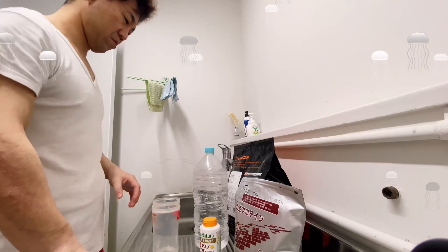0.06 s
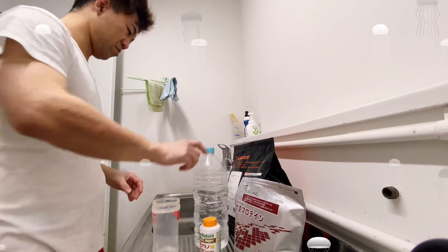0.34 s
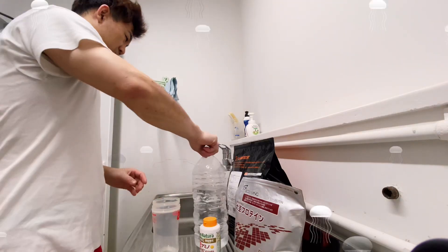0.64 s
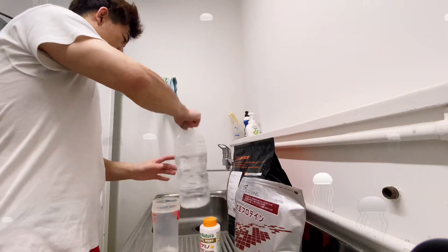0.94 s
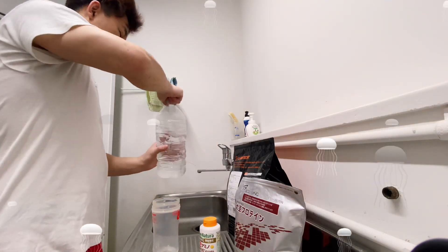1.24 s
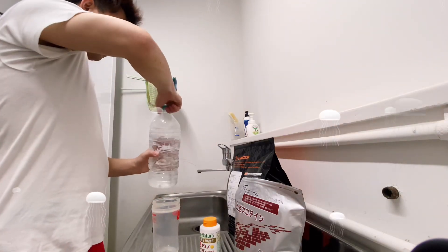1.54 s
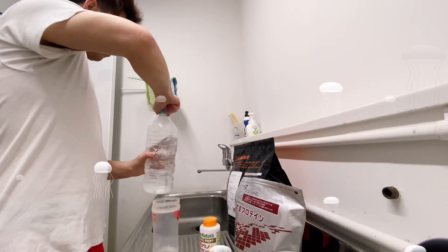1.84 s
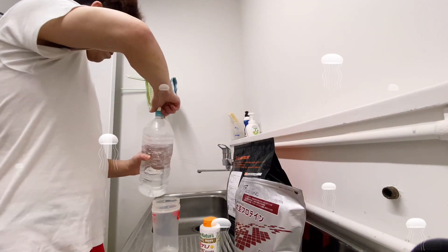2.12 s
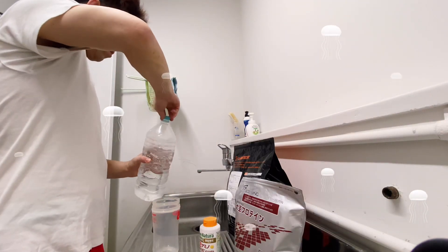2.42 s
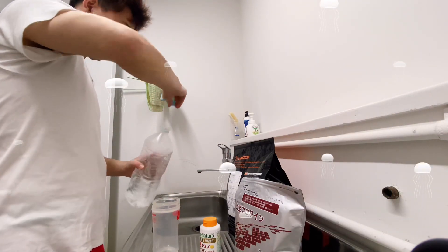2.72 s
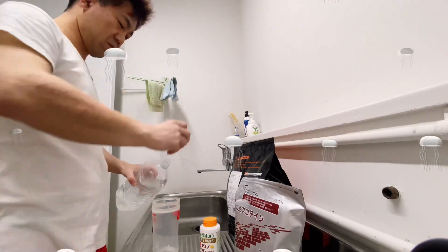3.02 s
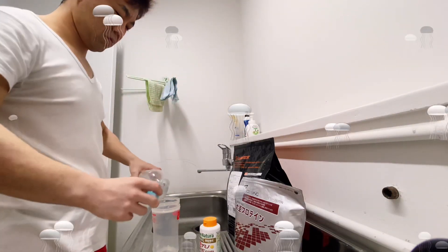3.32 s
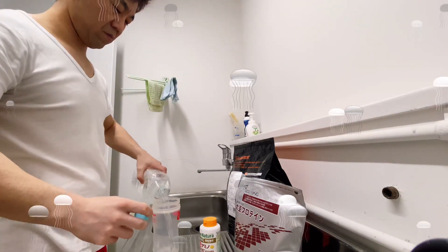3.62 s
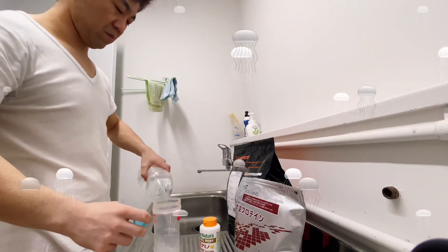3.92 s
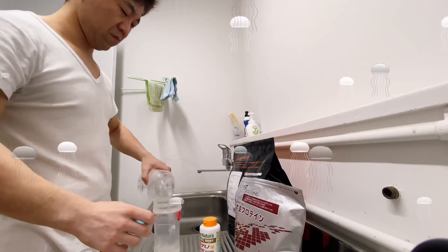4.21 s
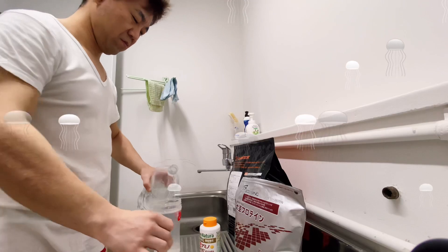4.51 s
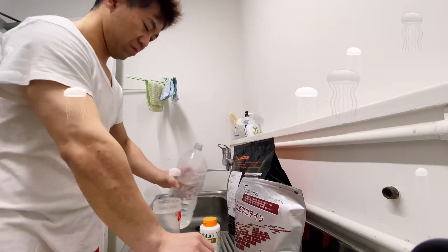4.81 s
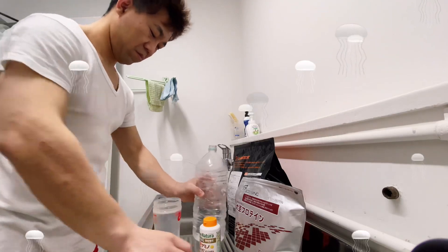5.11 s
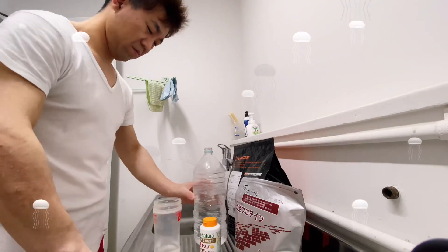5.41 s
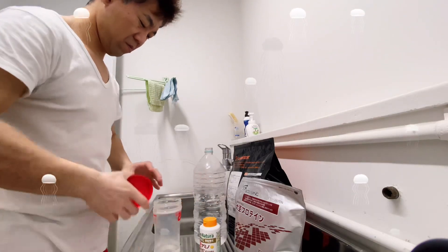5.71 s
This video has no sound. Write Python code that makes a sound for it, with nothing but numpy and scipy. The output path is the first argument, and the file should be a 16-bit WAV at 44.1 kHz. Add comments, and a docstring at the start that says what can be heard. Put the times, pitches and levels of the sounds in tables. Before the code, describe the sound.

Over a faint, low rush of ventilation, a loud plastic knock at a steel sink is followed by quiet cap twisting and hollow pops from a thin water bottle, one much louder than the rest. Water gushes and bubbles into a plastic cup for just over a second. Sharp clacks follow, then the bottle judders across the drainboard and thuds down. Everything is heard from nearby in a small, echoing room.

```python
"""A small, hard-walled washroom, where a big, thin plastic water bottle is handled at a steel sink.
Plastic clacks on the drainboard. The bottle's wall buckles with hollow pops and crackles as the cap is
twisted off. Water pours into a shaker cup: it drums on the bottom, splashes, and traps air that rings
as bubbles. The bottle is then knocked, slid and set down with a thud. Ventilation rushes underneath."""
import sys
import numpy as np
from scipy import signal
from scipy.fft import rfft, irfft, next_fast_len
from scipy.io import wavfile
from scipy.ndimage import map_coordinates

SR = 44100
rng = np.random.default_rng(int(sys.argv[2]) if len(sys.argv) > 2 else 0)


def digitize_waveform(pressure):
    """Quantize a signal to 16-bit integers and store it at the path in sys.argv[1].

    Rows of a 2-D input are taken as channels; values are limited to [-1, 1].
    """
    field = np.atleast_2d(pressure).T
    bounded = np.clip(field, -1, 1)
    quanta = np.round(bounded * 32767).astype(np.int16)
    wavfile.write(sys.argv[1], SR, quanta)


N = 253575
TIME = np.arange(N) / SR
RING_SAMPLES = SR // 2

# plastic hits the sink: t/s, clatter length/s, level/dB, hardness/0-1
KNOCKS = [(-.1, 0.08, -23, 0.63), (0.125, 0.039, -16, 0.55), (0.153, 0.14, -19.5, 0.45),
          (0.51, 0.02, -49.5, 0.78), (0.651, 0.011, -50, 0.56), (4.955, 0.014, -37.5, 0.9),
          (4.9789, 0.01, -25.5, 0.74), (5.002, 0.079, -27.5, 0.68), (5.155, 0.024, -35, 0.07),
          (5.335, 0.023, -30, 0), (5.365, 0.0071, -44.5, 0.76), (5.405, 0.019, -45.5, 0.81)]
# how a knock drives boom, clack and click, a row each: soft/dB, hard/dB
KNOCK_DRIVE = [(-9.5, -23.5), (-1, 0), (-35.5, 12.5)]
# the stream from the tilted bottle: t/s, level/dB
FLOW = [(3.52, -74), (3.63, -42.5), (3.73, -52.5), (3.89, -49.5), (4.05, -39.5), (4.188, -61), (4.28, -39),
        (4.45, -51.5), (4.75, -53), (4.919, -63)]
# the colour of fine spray: f/Hz, level/dB
SPRAY = [(800, -24), (2000, 4), (3200, 6), (5500, 3.5), (8000, 0.5), (10000, -9), (12000, -3),
         (16000, -16.5)]


def bottle_pops():
    """The thin wall snaps in under the grip, rings the air and water inside, and springs back softly."""
    # the wall buckles: t/s, length/s, level/dB, hardness/0-1, dent depth/dB, hollow ring/dB
    pops = [(1.093, 0.0075, -52.5, 0.59, 0, -63), (1.282, 0.0074, -46.5, 0.85, 1, -62),
            (1.292, 0.0094, -37.5, 0.57, 10.5, -31), (1.562, 0.0069, -46, 0.8, 7, -51),
            (1.761, 0.011, -51.5, 0.7, -1, -65), (1.798, 0.027, -48, 0.1, 7, -31.5),
            (1.874, 0.022, -33, 0.43, -6, -31), (1.9884, 0.008, -16.5, 0.59, -7.5, -17.5),
            (2.379, 0.011, -28, 0.05, -31, -33.5), (2.553, 0.019, -42, 0.79, 4, -40.5),
            (2.765, 0.019, -54.5, 0.02, -20.5, -58.5), (3.141, 0.027, -46.5, 0.22, 4, -49.5)]
    # how a pop drives thump, wall, slap and crackle, a row each: soft/dB, hard/dB
    pop_drive = [(3, -5.5), (0, -3), (-0.5, -2.5), (-29.5, 5.5)]
    # the four colours of a pop, low to high: f/Hz, level/dB
    thump = [(50, -43), (110, -8.5), (170, -5), (230, 2), (350, 1), (600, -9), (900, -15), (1500, -39),
             (5000, -61)]
    wall = [(100, -25), (220, -18), (310, -9.5), (400, 0), (470, 5), (540, -4), (620, 0.5), (740, -6.5),
            (900, -5.5), (1100, -12), (2300, -29), (6000, -84), (16000, -96)]
    slap = [(300, -50), (700, 6.5), (850, 2.5), (1000, -0.5), (1100, 2.5), (1260, 1), (1700, -10.5),
            (2300, -15), (2900, -25.5), (3600, -33), (6000, -52), (16000, -69)]
    crackle = [(300, -12), (1200, 17), (2200, 17.5), (3600, 8), (4500, 1.5), (7000, -9), (9500, -23),
               (11500, -38.5), (16000, -64)]
    # the hollow inside: pitch ratio, level/dB
    hollow_modes = [(.53, -12.5), (.72, -4), (.87, -2.5), (1, 4.5), (1.37, -1.5)]
    snaps, hollow = [], np.zeros((2, N))
    for t, length, db, hardness, dent_db, ring_db in pops:
        rebound = (t + 0.014, length * 1.66, db - 3)
        for at, span, level in ((t, length, db), rebound):
            thump_db, *shell_dbs = drive(pop_drive, level, hardness)
            snaps.append((at, span, thump_db + dent_db, *shell_dbs))
        hz = 415.4 + 3 * (ring_db + 30)  # a louder hollow ring sounds a little higher
        cavity = sum(amp(level) * ring(ratio * hz, t60=0.061, attack=0.012)
                     for ratio, level in hollow_modes)
        add(hollow, t, amp(ring_db) * dose(room(cavity, near_db=14.5, early_db=18.5)))
    return hollow + blows(snaps, (thump, wall, slap, crackle),
                          near_db=-2, early_db=2.5, rough=0.7, rise=0.15, trim_db=1.5)


def sink_knocks():
    """Plastic clatters on the steel drainboard, and the bottle's heavy base thuds."""
    # the three colours of a knock, low to high: f/Hz, level/dB
    boom = [(25, -32), (45, -21), (75, -13), (92, -21.5), (120, 8.5), (200, -8), (330, -8), (600, -9),
            (1500, -53.5), (5000, -75.5)]
    clack = [(80, -46.5), (250, -0.5), (450, -0.5), (850, 2), (1450, -1), (2500, -5.5), (4000, -16),
             (7000, -32), (16000, -51.5)]
    click = [(300, -38.5), (1500, 9.5), (2400, 10), (3300, 3), (4700, 0.5), (6200, -4.5), (8000, -7.5),
             (9800, -16.5), (11500, -15.5), (16000, -27)]
    # the base lands or bumps over a rib: t/s, level/dB, brightness/dB per octave
    thuds = [(.127, -30, -6.5), (.152, -31.5, -12.5), (.49, -36, 0), (0.586, -43.5, -16), (0.662, -47, -11),
             (.738, -44, -13), (5.179, -28.5, -5.5), (5.204, -30.5, -3), (5.241, -32, -5),
             (5.266, -34.5, 4.5), (5.3225, -23.5, -0.5), (5.344, -22.5, 5)]
    # the ring of the base: f/Hz, level/dB, t60/s
    base_modes = [(120.3, -9.5, 0.049), (185.5, -0.5, 0.051), (367, 2, 0.031), (484, 1.5, 0.021),
                  (619.4, -6.5, 0.25), (776.6, -5.5, 0.051)]
    hits = [(t, length, *drive(KNOCK_DRIVE, db, hardness)) for t, length, db, hardness in KNOCKS]
    track = blows(hits, (boom, clack, click),
                  near_db=-6.5, early_db=-1.5, rough=0.64, rise=0.06, trim_db=4.5)
    modes = [(np.log2(hz), amp(db) * ring(hz, t60, attack=0.011)) for hz, db, t60 in base_modes]
    for t, db, tilt_db in thuds:
        base = sum(amp(tilt_db * octave) * mode for octave, mode in modes)
        add(track, t, amp(db) * dose(room(base, near_db=2, early_db=-0.5)))
    return track


def water():
    """Gushes and a thin stream drum on the cup's bottom, splash, spray and froth."""
    # gushes land in the cup: t/s, length/s, level/dB, hardness/0-1
    gushes = [(3.526, 0.018, -39.5, 0.18), (3.605, 0.013, -36, 0.1), (3.635, 0.03, -40, 0),
              (3.954, 0.027, -25, 0.79), (3.983, 0.03, -24, 0.3), (4.115, 0.035, -43.5, 0),
              (4.227, 0.028, -33.5, 0.41), (4.313, 0.05, -41, 0.9), (4.418, 0.018, -48.5, 0.99),
              (4.505, 0.026, -44, 0.72), (4.605, 0.03, -42.5, 0.51), (4.723, 0.021, -47, 0.54)]
    # how a gush drives drum, splash and spray, a row each: soft/dB, hard/dB
    gush_drive = [(2.5, -23.5), (-11, -2), (-44, -0.5)]
    # the colours of the drumming bottom and of the splash: f/Hz, level/dB
    drum_colour = [(30, -25), (70, -7.5), (95, -10), (120, 2), (180, -6), (240, -5.5), (320, -5.5),
                   (480, -9), (1000, -19.5), (4000, -74.5)]
    splash_colour = [(120, -24), (300, -0.5), (500, 0), (900, 3), (1500, 0.5), (2400, -4), (4000, -19.5),
                     (8000, -28.5), (16000, -42)]
    hits = [(t, length, *drive(gush_drive, db, hardness)) for t, length, db, hardness in gushes]
    track = blows(hits, (drum_colour, splash_colour, SPRAY),
                  near_db=-7, early_db=-4, rough=1.4, rise=0.057, trim_db=4.5)
    t, flow_db = np.transpose(FLOW)
    drum_db = flow_db + 8 - 6.5 * (t - t[0])  # the bottom drums less as the cup fills
    spurts_per_s, spurt_db = 16, 4  # the stream breaks up, so the spray comes in spurts
    spurt_sizes = rng.standard_normal(int(TIME[-1] * spurts_per_s) + 4)
    spurts = amp(spurt_db * map_coordinates(spurt_sizes, [TIME * spurts_per_s]))
    drum = grains(drum_colour, t, drum_db, rate=310, scatter_db=1.5)
    splash = grains(splash_colour, t, flow_db, rate=220, scatter_db=0.5)
    spray = spurts * grains(SPRAY, t, flow_db - 12, rate=400, scatter_db=5)
    gurgle = froth(count=100, low_hz=333, high_hz=2540, cycles=20, level_db=flow_db - 8, range_db=21)
    fizz = froth(count=120, low_hz=3940, high_hz=12000, cycles=8.7, level_db=flow_db - 10.5, range_db=14)
    stream = drum + splash + spray + gurgle + fizz
    add(track, 0, amp(-9.5) * room(stream, near_db=-10.5, early_db=-4.5))
    return track


def froth(count, low_hz, high_hz, cycles, level_db, range_db):
    """Small bubbles chirp upward all through the pour, following its level."""
    track, t = np.zeros((1, N)), np.transpose(FLOW)[0]
    for when, height, weakness in rng.random((count, 3)):
        at = t[0] + when * (t[-1] - t[0])
        hz = low_hz * (high_hz / low_hz) ** height
        gain = amp(np.interp(at, t, level_db) - range_db * weakness)
        add(track, at, gain * ring(hz, cycles / hz, attack=0.0005, glide=0.35)[None])
    return track[0]


def trapped_air():
    """Pockets of trapped air gurgle and fizz in the cup."""
    # a pocket breaks up: t/s, length/s, f/Hz, level/dB
    pockets = [(3.547, 0.035, 492, -37), (3.607, .05, 453, -38), (3.786, .02, 10600, -56.5),
               (3.8, 0.043, 8900, -51), (4.011, 0.031, 3290, -33), (4.126, 0.027, 11300, -51),
               (4.226, .04, 503, -38), (4.237, .04, 737, -35.5), (4.306, 0.027, 3900, -51),
               (4.319, 0.033, 1480, -38.5), (4.343, 0.028, 1730, -34.5), (4.36, .03, 10900, -56.5),
               (4.409, 0.033, 8300, -49.5), (4.416, 0.018, 3220, -54), (4.445, .03, 7300, -49),
               (4.485, 0.055, 1920, -44.5), (4.632, 0.016, 2370, -46), (4.718, .04, 6100, -59)]
    track = np.zeros((1, N))
    for t, length, hz, db in pockets:
        add(track, t, amp(db - 9.5) * bubble_cluster(hz, length)[None])
    return room(track[0], near_db=2.5, early_db=2)[:, :N]


def bubble_cluster(hz, length, count=11, spread=0.06, climb=0.12, range_db=12):
    """One pocket of air breaks into short-lived bubbles, the later ones smaller and higher."""
    cluster, order = np.zeros((1, N)), np.arange(count) / count
    for when, detune, weakness in zip(order, rng.standard_normal(count), rng.random(count)):
        pitch = hz * np.exp(spread * detune + climb * (when - 0.5))
        t60 = 0.015 * (1000 / pitch) ** 0.5  # smaller bubbles die sooner
        bubble = amp(-range_db * weakness) * ring(pitch, t60, attack=0.0003, glide=0.05)
        add(cluster, (when + rng.random() / count) * length, bubble[None])
    return dose(cluster[0, :RING_SAMPLES])


def dribbles():
    """Until water covers it, the cup's thin bottom rings under each dribble."""
    # the first dribbles: t/s, length/s, level/dB
    hits = [(3.529, 0.027, -56.5), (3.695, 0.012, -34), (3.755, 0.087, -43), (3.825, 0.03, -41.5),
            (3.9, 0.085, -43)]
    # the colour of the bare bottom: f/Hz, level/dB
    cup = [(1000, -29), (1250, -10), (1430, 4), (1600, -19), (2350, -8), (2680, 5.5), (2880, -2), (3050, 7),
           (3250, -13), (4300, -12), (4700, -6), (5400, -13), (7000, -16), (9000, -31)]
    return blows(hits, (cup,), near_db=-12, early_db=20, rough=1.7, rise=0.034, trim_db=1.5)


def spatters():
    """Drops fly off the stream and tick on the cup's wall."""
    t, flow_db = np.transpose(FLOW)
    drops = grains(SPRAY, t, flow_db - 13, rate=110, scatter_db=1)
    return room(drops, near_db=-1.5, early_db=1)[:, :N]


def drags():
    """The bottle's base judders over the drainboard's ribs as it is picked up and put back."""
    # the base slides: t/s, length/s, level/dB
    slides = [(0.428, 0.033, -36.5), (0.55, 0.063, -57), (0.719, 0.062, -44.5), (5.148, 0.18, -33.5)]
    # the colour of the judder: f/Hz, level/dB
    colour = [(25, -25.5), (45, -7.5), (75, 3.5), (92, -14), (120, 0), (180, 3.5), (250, -4), (340, -7),
              (600, -10), (1500, -11), (5000, -51.5)]
    level_db = np.max([stroke(t, hold, db, rise=0.023, release=0.44) for t, hold, db in slides], axis=0)
    judder = grains(colour, TIME, level_db - 3.5, rate=440, scatter_db=-0.5)
    return room(judder, near_db=-1, early_db=-2.5)[:, :N]


def cracks():
    """Hard plastic edges crack, and the cap's ribs click under the fingers."""
    # cracks and clicks: t/s, length/s, level/dB
    hits = [(.1253, 0.0025, -19), (1.089, 0.01, -67), (1.283, 0.0079, -53), (1.5326, .008, -59),
            (1.5596, 0.0068, -50), (1.7666, 0.0015, -52.5), (2.5538, 0.0025, -63), (2.5822, .008, -62),
            (3.6914, 0.0034, -42.5), (4.4417, .003, -42.5), (4.957, .003, -30), (4.9855, .003, -27)]
    # their bright colour: f/Hz, level/dB
    colour = [(500, -20), (2000, -3.5), (4000, 1), (6000, 1), (8000, -5), (10000, -11.5), (11500, -7),
              (16000, -16)]
    return blows(hits, (colour,), near_db=2.5, early_db=1, rough=0.6, rise=0.1, trim_db=0)


def pings():
    """A stiff patch of the bottle's wall snaps through: a brief ping with a faint, longer ring."""
    # the patch snaps: t/s, f/Hz, level/dB
    snaps = [(3.6939, 2910, -46.5), (4.957, 3380, -28)]
    # its ring: pitch ratio, level/dB, t60/s
    modes = [(1, -3, 0.012), (.6, -20, 0.0096), (1.005, -9.5, 0.27), (1.659, -15, .25)]
    track = np.zeros((2, N))
    for t, hz, db in snaps:
        patch = sum(amp(level) * ring(ratio * hz, t60, attack=0.00038) for ratio, level, t60 in modes)
        add(track, t, amp(db) * room(patch, near_db=1.5, early_db=-3.5))
    return track


def ticks(length_s=0.0018):
    """The sharpest snaps, stray or on the front of a knock, arrive almost dry."""
    # stray snaps of plastic and drops: t/s, level/dB
    strays = [(1.7668, -50), (1.9915, -53), (3.6295, -50), (3.693, -52), (4.1259, -47), (4.247, -51),
              (4.3065, -55), (4.4417, -45), (4.516, -54), (4.726, -54.5), (4.986, -35), (4.9935, -30),
              (5.0495, -32.5), (5.345, -57.5)]
    # their thin, top-end colour: f/Hz, level/dB
    colour = [(2000, -21), (5000, -1.5), (8000, -3), (12000, 4), (16000, 2)]
    leading = [(t, drive(KNOCK_DRIVE, db, hardness)[-1] - 12) for t, _, db, hardness in KNOCKS]
    hits = [(t, length_s, db) for t, db in leading + list(strays)]
    return blows(hits, (colour,), near_db=7, early_db=-1, rough=0.7, rise=0.03, trim_db=-3)


def fingers():
    """At each twist of the cap, skin sticks and slips on ribbed plastic in a fine crinkle."""
    # twists of the cap: t/s, level/dB
    twists = [(1.105, -62), (1.31, -57.5), (1.564, -52.5), (1.77, -57.5), (1.951, -53), (2.14, -55),
              (2.328, -53.5), (2.59, -72)]
    # the colour of the rub: f/Hz, level/dB
    colour = [(600, -13), (2000, 10.5), (4000, 2.5), (7000, -1.5), (9500, -12.5), (11500, -3.5),
              (15000, -10), (17000, -20)]
    level_db = np.max([stroke(t, 0, db, rise=0.26, release=0.19) for t, db in twists], axis=0)
    crinkle = grains(colour, TIME, level_db, rate=2200, scatter_db=30)
    return room(crinkle, near_db=-17, early_db=-8)[:, :N]


def sleeve():
    """A cotton sleeve slides over the arm in a faint, even rustle as the bottle is lifted."""
    # the colour of the cloth: f/Hz, level/dB
    colour = [(1000, -2), (2500, 3.5), (3400, -9), (3950, -3.5), (4400, -7), (7000, -20), (12000, -47)]
    level_db = stroke(t=0.72, hold=0.33, db=-69, rise=0.2, release=0.37)
    rustle = grains(colour, TIME, level_db, rate=3000, scatter_db=-0.5)
    return room(rustle, near_db=-3, early_db=-1)[:, :N]


def ventilation(level_db=-56, side_db=-7):
    """A faint, low rush of air fills the room."""
    # the colour of the rush: f/Hz, level/dB
    air = [(20, -16), (40, 10), (60, 0), (110, -5.5), (170, 2.5), (205, -14.5), (245, 2.5), (370, -17.5),
           (850, -12.5), (1500, -23), (3000, -38.5), (11000, -48.5), (16000, -60.5)]
    mid, side = filtered(rng.standard_normal((2, N)), lambda hz: amp(along(air, hz)))
    return amp(level_db) * unit(np.array([mid + amp(side_db) * side, mid - amp(side_db) * side]))


def room(x, near_db, early_db, early_t60=0.29, right_delay_s=0.0003):
    """Direct sound at near_db, quick echoes around the sink at early_db, and the walls' long tail."""
    # the tail's decay: f/Hz, t60/s
    decay = [(60, 1.6), (170, 0.92), (340, 0.66), (500, 1.05), (1300, 1.03), (2700, 0.8), (4300, 0.71),
             (5600, 0.7), (8000, 0.61), (15000, 0.7)]
    # stereo width, side against mid: f/Hz, level/dB
    width = [(60, -15), (130, -27), (250, 2), (450, 2.5), (1000, 1.5), (8000, -1.5)]
    hz, _, noise = signal.stft(rng.standard_normal((2, SR * 5 // 4)), SR, nperseg=256)
    t = np.arange(noise.shape[2]) * 128 / SR
    tail = amp(-60 * t / along(decay, hz)[:, None])
    early = 2 * amp(early_db) * amp(-60 * t / early_t60)
    echoes = noise * np.hypot(tail, early)
    side_gain = amp(along(width, hz))[:, None]
    mid_side = np.array([echoes[0], echoes[1] * side_gain]) / np.hypot(1, side_gain)
    mid, side = signal.istft(mid_side, SR, nperseg=256)[1]
    paths = np.array([mid + side, mid - side]) / np.sqrt(SR / 20)
    paths[0, 0] += amp(near_db)
    paths[1, round(right_delay_s * SR)] += amp(near_db)  # the left side is nearer
    return signal.fftconvolve(x[None], paths, axes=1)


def blows(hits, colours, near_db, early_db, rough, rise, trim_db):
    """Each hit (t/s, length/s, a level/dB per colour) is a burst of tiny contacts ringing an object."""
    track, responses = np.zeros((2, N)), [body(colour) for colour in colours]
    for t, length, *levels in hits:
        progress = np.arange(int(2 * length * SR) + 2) / (length * SR)
        count, sound = len(progress), 0
        for response, db in zip(responses, levels):
            contacts = rng.standard_normal(count) * np.exp(rough * rng.standard_normal(count))
            force = contacts * (1 - np.exp(-progress / rise)) * np.exp(-2 * progress)
            sound = sound + amp(db) * dose(signal.fftconvolve(force, response))
        strength = np.linalg.norm(amp(levels))  # sets the whole hit's energy, echoes included
        add(track, t, amp(trim_db) * strength * dose(room(sound, near_db, early_db)))
    return track


def grains(colour, times, level_db, rate, scatter_db):
    """Tiny impacts of unequal size strike at random, rate a second, under a level envelope."""
    impacts = (rng.random(N) < rate / SR) * rng.standard_normal(N)
    impacts *= amp(scatter_db * np.clip(rng.standard_normal(N), -2, 2))
    envelope = amp(np.interp(TIME, times, level_db, left=-120, right=-120))
    return envelope * unit(signal.fftconvolve(impacts, body(colour))[:N])


def ring(hz, t60, attack, glide=0):
    """A dying sine whose pitch rises by the share glide during its life."""
    t = np.arange(RING_SAMPLES) / SR
    pitch = hz * (1 + glide * np.minimum(t / t60, 1))
    envelope = amp(-60 * t / t60) * (1 - np.exp(-t / attack))
    return dose(envelope * np.sin(2 * np.pi * np.cumsum(pitch) / SR))


def body(colour):
    """The minimum-phase impulse response of an object with this colour."""
    hz, half = np.fft.rfftfreq(RING_SAMPLES, 1 / SR), RING_SAMPLES // 2
    cepstrum = irfft(np.log(amp(along(colour, hz))))
    cepstrum[1:half] *= 2
    cepstrum[half:] = 0
    return irfft(np.exp(rfft(cepstrum)))[:half]


def drive(parts, db, hardness):
    """Level in dB of each part of an object: harder contact sends more to the high parts."""
    soft, hard = np.transpose(parts)
    return db + soft + np.clip(hardness, 0, 1) * (hard - soft)


def stroke(t, hold, db, rise, release):
    """Level in dB of one movement: up 40 dB in rise seconds, held from t, down 40 dB in release."""
    return db - 40 * (np.maximum(t - TIME, 0) / rise + np.maximum(TIME - t - hold, 0) / release)


def amp(db):
    """Decibels to gain."""
    return 10 ** (np.asarray(db) / 20)


def unit(x):
    """Scale to rms 1."""
    return x / np.sqrt(np.mean(x ** 2) + 1e-20)


def dose(x):
    """Scale a short sound to the energy of a twentieth of a second at rms 1."""
    return x * np.sqrt(SR / 20 / np.sum(x ** 2))


def along(points, hz):
    """Read (f/Hz, value) points on a log frequency axis."""
    f, values = np.transpose(points)
    return np.interp(np.log(hz + 1), np.log(f), values)


def filtered(x, response):
    """Pass x through a response given as a function of frequency."""
    size = next_fast_len(N + SR // 2)
    return irfft(rfft(x, size) * response(np.fft.rfftfreq(size, 1 / SR)), size)[..., :N]


def add(track, t, sound):
    """Mix a sound in at t seconds, which may lie before the start."""
    start = round(t * SR)
    part = sound[:, max(-start, 0):N - start]
    track[:, max(start, 0):][:, :part.shape[1]] += part


def standing_waves(f):
    """The response of the resonances between the hard walls."""
    # room modes: f/Hz, bandwidth/Hz, level/dB
    modes = [(116, 16, -7), (184.1, 8, 0), (233.6, 8.9, 1), (434, 1.6, -20.5), (602, 4.1, -3),
             (1300, 50, -15)]
    return 1 + sum(amp(db) * 1j * f * band / (hz * hz - f * f + 1j * f * band) for hz, band, db in modes)


def scene():
    """Handling and pouring, coloured by the room and panned by frequency, over the ventilation."""
    # left against right: f/Hz, level/dB
    balance = [(60, -2.5), (130, -3.5), (250, -4), (500, 3.5), (1000, 1.5), (2000, 0.5), (4000, 4),
               (8000, 1.5)]
    pan = lambda hz: amp(np.outer([0.5, -0.5], along(balance, hz)))
    handling = sink_knocks() + drags() + bottle_pops() + pings() + cracks() + ticks()
    handling = handling + fingers() + sleeve()
    pouring = dribbles() + spatters() + water() + trapped_air()
    return filtered(handling + pouring, lambda hz: standing_waves(hz) * pan(hz)) + ventilation()


def record(dry, notch_hz=13200, notch_width_hz=560, notch_db=-32, top_hz=16200):
    """The microphone ports notch the treble, and the top end is cut off steeply."""
    ports = filtered(dry, lambda hz: amp(notch_db * np.exp(-((hz - notch_hz) / notch_width_hz) ** 2)))
    return filtered(ports, lambda hz: amp(-np.logaddexp(0, (hz - top_hz) / 12)))


dry = scene()
out = record(dry)
digitize_waveform(out)
```